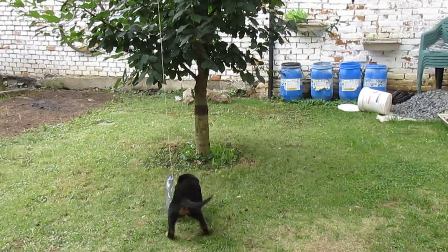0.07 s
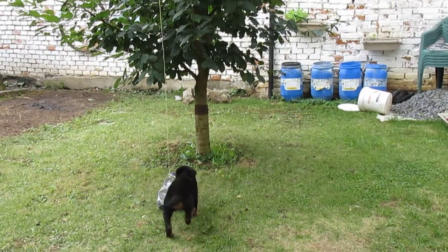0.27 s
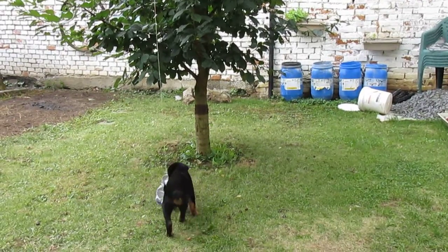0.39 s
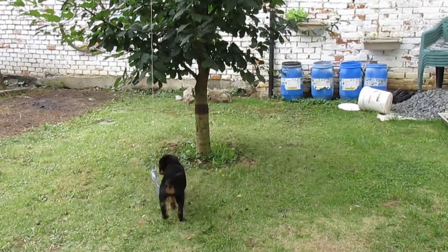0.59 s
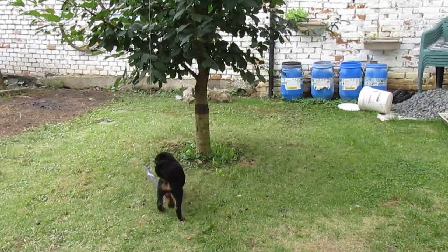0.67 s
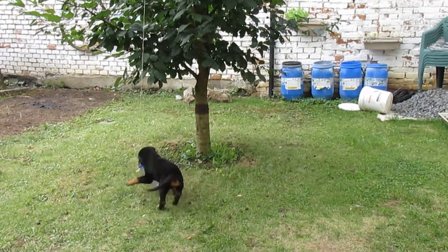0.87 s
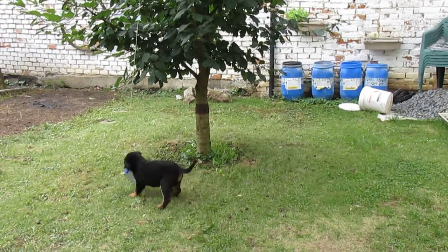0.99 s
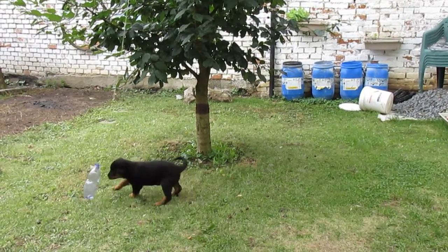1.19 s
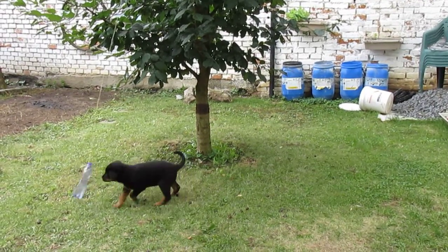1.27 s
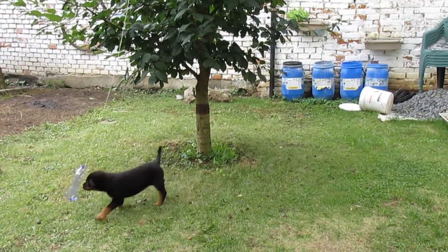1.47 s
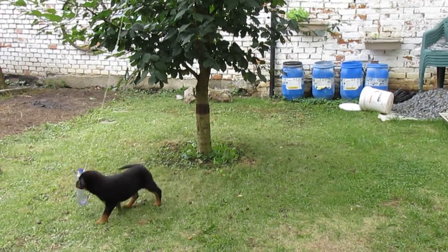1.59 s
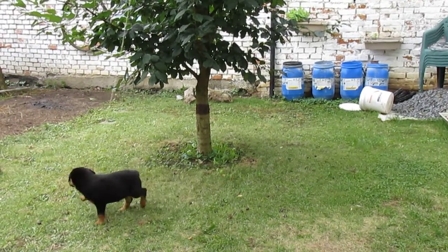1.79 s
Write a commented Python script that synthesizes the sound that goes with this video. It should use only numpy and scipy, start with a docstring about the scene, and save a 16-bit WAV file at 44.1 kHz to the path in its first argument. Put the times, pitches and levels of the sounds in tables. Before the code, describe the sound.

Low, uneven gusts buffet the microphone outdoors on a lawn. After a very brief, quiet puppy growl come two light taps and one sharp, hollow knock on an empty plastic bottle, then faint crinkles over soft leaf rustle.

```python
"""A lawn in a walled garden. A puppy growls briefly, slow pulses ringing in its throat, and knocks an
empty plastic bottle hanging from a rope: two light taps, one sharp hit and faint crinkles of the wall.
Gusts rumble on the microphone ports, largely in opposite phase left and right, with short buffets on top.
A fine rustle of leaves and grass comes from the left, over a bed of quiet air."""
import sys
import numpy as np
from scipy import signal
from scipy.fft import rfft, irfft
from scipy.io import wavfile
from scipy.ndimage import uniform_filter1d, minimum_filter1d

SR = 44100
rng = np.random.default_rng(int(sys.argv[2]) if len(sys.argv) > 2 else 0)


def master_out(mix):
    """Clip the mix to full scale and print it as 16-bit PCM to the path in sys.argv[1]."""
    frames = np.transpose(np.atleast_2d(mix))
    ceiling = np.clip(frames, -1, 1)
    pcm = np.round(ceiling * 32767).astype(np.int16)
    wavfile.write(sys.argv[1], SR, pcm)


N = 79380
T = np.arange(N) / SR
BIN_HZ = np.arange(N // 2 + 1) * SR / N

# Tone of the garden air. Each row: frequency in Hz, relative level in dB.
AIR_COLOUR = [(20, 12.5), (100, 17), (300, 8), (550, 1.5), (900, -1), (1500, -4), (2500, -9.5),
              (5000, -12.5), (10000, -14), (16000, -19)]

# Swells of the leaves and grass. Each row: time in seconds, relative level in dB.
RUSTLE_SWELLS = [(0.0, -61.5), (0.07, -53), (0.154, -59), (0.274, -52.5), (0.334, -63.5), (0.4, -69),
                 (0.416, -61), (0.596, -66), (0.616, -60.5), (0.636, -63.5), (0.71, -61), (0.732, -53),
                 (0.862, -64.5), (1.032, -56.5), (1.056, -63.5), (1.088, -57), (1.172, -58.5), (1.192, -50),
                 (1.238, -66), (1.332, -56), (1.382, -68), (1.618, -64), (1.638, -58.5), (1.8, -63.5)]
# Crisp ticks in the grass. Each row: start in seconds, relative level in dB.
GRASS_TICKS = [(.612, -53), (.728, -48), (.938, -50.5), (0.978, -54), (1.192, -60), (1.630, -48)]
# Tone of the rustle and of the ticks. Each row: frequency in Hz, relative level in dB.
RUSTLE_COLOUR = [(1500, -10.5), (3500, -8), (5500, -7.5), (7500, 0), (9000, 2.5), (11000, -0.5),
                 (13000, -10), (16000, -21)]
TICK_COLOUR = [(1500, -16), (5000, -18), (9000, 5.5), (12500, 1), (16000, -23)]
RUSTLE_GAIN_DB, RUSTLE_GRAIN_DB, RUSTLE_CORRELATION = 2.5, 1.5, 0.13

# Gusts on the microphone. Each row: time in seconds, relative level in dB, left minus right in dB.
GUSTS = [(0.0, -57, -13), (0.104, -61.5, -5), (0.18, -32, -4.5), (0.27, -25.5, 10), (0.3, -30.5, 3),
         (0.36, -25, 3.5), (0.476, -27.5, 10), (0.5, -38, 0.5), (0.56, -22, 3.5), (0.606, -27, 8),
         (0.65, -38.5, -2.5), (0.676, -27.5, -6), (0.716, -44, 30), (0.752, -22, 4), (0.846, -24.5, 11),
         (0.902, -29, 8.5), (0.976, -21.5, 8.5), (1.158, -33.5, 4.0), (1.332, -23.5, 2.5),
         (1.392, -41, 11.5), (1.514, -55, -4), (1.564, -45, -11), (1.604, -37, -14), (1.698, -68, 4),
         (1.744, -52.5, -9), (1.8, -60, 5)]
# Tone of the rumble in light and in strong wind. Each row: frequency in Hz, relative level in dB.
LIGHT_WIND_COLOUR = [(15, -4), (35, 2.5), (90, 2), (140, -16.5), (220, -24.5), (400, -37), (900, -96),
                     (3000, -100)]
STRONG_WIND_COLOUR = [(15, -18), (35, 4), (70, -2), (130, 4.5), (200, -9), (310, -23), (450, -31),
                      (800, -47.5), (3000, -82)]
LIGHT_GUST_DB, STRONG_GUST_DB, WIND_GAIN_DB, PORT_CORRELATION = -33.5, -23, 8.5, -0.79

# The puppy's throat resonances. Each row: frequency in Hz, bandwidth in Hz, relative level in dB.
THROAT_FORMANTS = [(396, 92, -4), (524, 86, -14)]
GROWL_DB, GROWL_PULSE_HZ, GROWL_JITTER, GROWL_SHIMMER_DB = -45.5, 109.8, 0.142, 3
GROWL_ONSET_DB, GROWL_ATTACK_S, GROWL_END_S = -0.5, 0.02, 0.058

WALLS_DB, WALLS_T60_S, WALLS_DELAY_S = -14, 0.3, 0.034

# Knocks on the bottle. Each row: start in seconds, gain in dB, low-pass cutoff of the contact in Hz.
KNOCKS = [(.1384, -11.5, 550), (0.2214, -10, 1500), (.7615, 1.5, 4340)]
# The bottle's hollow ring. Each row: frequency in Hz, relative level in dB, 60 dB decay in seconds.
BOTTLE_MODES = [(385, -4, .24), (428, -7, .27), (552, -3, .24), (651, -6, .2), (985, -10.5, .15),
                (1069, -12, .15), (1170, -13, .14), (1272, -12, .13), (1423, -10, .13), (1563, -10, .13),
                (1919, -12, .13), (2031, -13.5, .13), (2770, -14, .15), (3052, -19, .13)]
# Tone of the thin wall's crackle. Each row: frequency in Hz, relative level in dB.
CRACKLE_COLOUR = [(220, -15), (370, 12.5), (600, 13), (800, -17), (1100, 5), (1700, -1), (3300, -3.5),
                  (6000, -11.5), (9000, -57), (16000, -39)]
MODES_DB, CRACKLE_DB, CRACK_DB, BOTTLE_PAN_DB = -36, -37.5, -37, 0.5
REBOUND_S, REBOUND_GAIN_DB, REBOUND_CUTOFF_HZ = 0.007, 3, 840

# Eddies hitting the ports. Each row: centre time in seconds, level in dB, half length in seconds,
# upper edge in Hz, left minus right in dB.
EDDIES = [(0.26, -12.5, 0.0044, 155, 4), (0.323, -17, 0.0026, 150, 13), (0.352, -16, 0.0031, 313, 7.5),
          (0.362, -14.5, 0.0045, 241, 22), (0.406, -26, 0.0058, 350, 9), (0.461, -22.5, 0.0052, 303, 7),
          (0.555, -12, 0.006, 245, 14.5), (0.607, -22, 0.0052, 263, 11.5), (.636, -24, 0.0062, 203, -3.5),
          (.760, -11.5, 0.012, 120, 3.5), (0.83, -16, 0.0059, 259, 11), (0.849, -18.5, 0.0077, 235, 8),
          (0.946, -13.5, 0.0036, 260, 14.5), (0.956, -18.5, 0.0021, 276, 5), (.959, -33, 0.0021, 1020, 32),
          (0.975, -13, 0.0048, 270, -6), (1.013, -25, 0.0061, 333, 12.5), (1.046, -15.5, 0.017, 220, 5.5),
          (1.2, -23, 0.0066, 245, 16), (1.277, -13, 0.006, 235, -0.5), (1.319, -16.5, 0.0047, 305, -11.5),
          (1.335, -10, 0.0054, 144, 8), (1.571, -23, 0.0071, 95, -6), (1.606, -30.5, 0.005, 94, -8)]
BUFFET_LOW_CUT_RATIO, BUFFET_ROLLOFF_ORDER = 0.084, 5.65

# Crinkles of the plastic. Each row: start in seconds, level in dB.
CRINKLES = [(.266, -55), (1.0982, -56.5), (1.339, -57)]
# Tone of the crinkles. Each row: frequency in Hz, relative level in dB.
CRINKLE_COLOUR = [(700, -35), (1400, -16), (2100, 1), (3000, -14), (6000, -24)]

CEILING, LIMITER_S, HIGH_CUT_HZ = 0.9, 0.02, 15800


def from_db(db):
    return 10 ** (np.asarray(db) / 20)


def unit_rms(x):
    return x / np.sqrt(np.mean(x ** 2) + 1e-20)


def automation(rows):
    """Breakpoints in time become one curve per column."""
    times, *columns = np.transpose(rows)
    return [np.interp(T, times, column) for column in columns]


def decay(start_s, t60):
    """An envelope that opens at start_s and falls 60 dB in t60 seconds."""
    return (T >= start_s) * np.exp(-np.log(1000) * np.abs(T - start_s) / t60)


def pan(db):
    """Constant-power gains, with the left db above the right."""
    gains = from_db(np.array([[.5], [-.5]]) * db)
    return gains / np.sqrt(np.mean(gains ** 2, axis=0))


def stereo_noise(correlation):
    """White noise with a given left-right correlation."""
    mid, side = rng.standard_normal((2, N))
    return np.sqrt(1 + correlation) * mid + np.sqrt(1 - correlation) * side * np.array([[1], [-1]])


def coloured(noise, colour):
    """Noise through an EQ curve, brought to an rms of 1."""
    hz, db = np.transpose(colour)
    eq_db = np.interp(np.log(np.maximum(BIN_HZ, 1)), np.log(hz), db)
    return unit_rms(irfft(rfft(noise) * from_db(eq_db), N))


def levelled(noise, seconds):
    """Noise with its slow swings of level ironed out."""
    power = np.mean(noise ** 2, axis=0)
    for _ in range(2):
        power = uniform_filter1d(power, int(seconds * SR))
    return noise / np.sqrt(np.abs(power) + 1e-12)


def low_pass(x, hz):
    return signal.sosfilt(signal.butter(1, hz, fs=SR, output="sos"), x)


def ring(clicks, hz, t60):
    """Each click sets a decaying sine ringing."""
    radius, angle = np.exp(-np.log(1000) / (t60 * SR)), 2 * np.pi * hz / SR
    return signal.lfilter([0, np.sin(angle)], [1, -2 * radius * np.cos(angle), radius ** 2], clicks + 1e-18)


def garden_air():
    """A soft, wide, steady bed of dark noise."""
    return from_db(-52) * coloured(stereo_noise(0.22), AIR_COLOUR)


def rustle():
    """Countless tiny leaf and grass contacts merge into a grainy hiss; a few stand out as bright ticks."""
    swell_db, = automation(RUSTLE_SWELLS)
    grain = unit_rms(low_pass(rng.standard_normal(N), hz=150))
    hiss = from_db(swell_db + RUSTLE_GAIN_DB) * coloured(stereo_noise(RUSTLE_CORRELATION), RUSTLE_COLOUR)
    tick_envelope = sum(from_db(db) * decay(start_s, t60=0.034) for start_s, db in GRASS_TICKS)
    ticks = tick_envelope * coloured(stereo_noise(RUSTLE_CORRELATION), TICK_COLOUR)
    return (hiss + ticks) * from_db(RUSTLE_GRAIN_DB * grain) * pan(db=14)


def wind():
    """Turbulence at the ports: the rumble gets louder and opens up as the gust grows."""
    gust_db, pan_db = automation(GUSTS)
    white = stereo_noise(PORT_CORRELATION)
    light, strong = coloured(white, LIGHT_WIND_COLOUR), coloured(white, STRONG_WIND_COLOUR)
    strength = np.clip((gust_db - LIGHT_GUST_DB) / (STRONG_GUST_DB - LIGHT_GUST_DB), 0, 1)
    rumble = (1 - strength) * light + strength * strong
    return levelled(rumble, seconds=0.041) * from_db(gust_db + WIND_GAIN_DB) * pan(pan_db)


def growl():
    """A short run of slow, uneven pulses rings the puppy's throat."""
    times = np.cumsum(1 + GROWL_JITTER * rng.standard_normal(16)) / GROWL_PULSE_HZ
    times = np.abs(times - times[0])
    attack_db = GROWL_ONSET_DB * np.maximum(1 - times / GROWL_ATTACK_S, 0)
    shimmer_db = GROWL_SHIMMER_DB * rng.standard_normal(len(times))
    pulses = np.zeros(N)
    pulses[(times * SR).astype(int)] = from_db(attack_db + shimmer_db) * (times < GROWL_END_S)
    voice = sum(from_db(db) * ring(pulses, hz, t60=np.log(1000) / (np.pi * width_hz))
                for hz, width_hz, db in THROAT_FORMANTS)
    voice = signal.sosfilt(signal.butter(3, [280, 680], "band", fs=SR, output="sos"), voice)
    return from_db(GROWL_DB) * unit_rms(voice) * np.sqrt(GROWL_END_S * SR / N)  # rms over the growl's span


def wall_echoes(source):
    """The garden walls scatter back a weak, dull tail, different at each ear."""
    envelope = decay(WALLS_DELAY_S, WALLS_T60_S)
    tail = low_pass(stereo_noise(0.3), hz=854) * envelope / np.sqrt(np.sum(envelope ** 2))
    return from_db(WALLS_DB) * signal.fftconvolve(source, tail, axes=1)[:, :N]


def bottle_contact(start_s):
    """One contact rings the bottle's modes; the thin wall cracks and crackles out."""
    click = np.zeros(N)
    click[int(start_s * SR)] = 1
    modes = sum(from_db(MODES_DB + db) * rng.choice([-1, 1]) * ring(click, hz, t60)
                for hz, db, t60 in BOTTLE_MODES)
    crackle = from_db(CRACKLE_DB) * decay(start_s, t60=0.19) * coloured(stereo_noise(0.35), CRACKLE_COLOUR)
    crack = from_db(CRACK_DB) * decay(start_s, t60=0.065) * unit_rms(low_pass(stereo_noise(0.17), hz=3870))
    return modes + crackle + crack


def bottle_knocks():
    """Each knock is a tight flam: a strike, then its duller rebound."""
    knocks = 0
    for start_s, db, cutoff_hz in KNOCKS:
        strike = bottle_contact(start_s)
        rebound = from_db(REBOUND_GAIN_DB) * low_pass(bottle_contact(start_s + REBOUND_S), REBOUND_CUTOFF_HZ)
        knocks += from_db(db) * low_pass(strike + rebound, cutoff_hz)
    return knocks * pan(BOTTLE_PAN_DB)


def buffets():
    """Each eddy thumps the ports: a brief swell of pressure noise with a steep upper edge."""
    thumps = 0
    for centre_s, db, half_s, edge_hz, pan_db in EDDIES:
        low_cut = BIN_HZ ** 2 / (BIN_HZ ** 2 + (BUFFET_LOW_CUT_RATIO * edge_hz) ** 2)
        high_cut = 1 / np.sqrt(1 + (BIN_HZ / edge_hz) ** (2 * BUFFET_ROLLOFF_ORDER))
        pressure = irfft(rfft(stereo_noise(PORT_CORRELATION)) * low_cut * high_cut, N)
        swell = np.exp(-.5 * ((T - centre_s) / half_s) ** 2)
        thump = unit_rms(pressure * swell) * np.sqrt(np.mean(swell ** 2))  # rms near 1 at the crest
        thumps += thump * from_db(db) * pan(pan_db)
    return thumps


def crinkles():
    """The plastic crinkles faintly as the puppy mouths it."""
    envelope = sum(from_db(db) * decay(start_s, t60=0.088) for start_s, db in CRINKLES)
    return envelope * coloured(stereo_noise(0.41), CRINKLE_COLOUR) * pan(BOTTLE_PAN_DB)


def scene():
    """The breezy garden mix; only the puppy and its bottle feed the wall echoes."""
    air = garden_air()
    play = bottle_knocks() + crinkles() + growl()
    return air + rustle() + wind() + buffets() + play + wall_echoes(play)


def record(dry):
    """A smooth limiter ducks any peak over the ceiling; a steep filter trims the top."""
    span = int(LIMITER_S * SR)
    gain = CEILING / np.maximum(np.abs(dry).max(axis=0), CEILING)
    gain = uniform_filter1d(minimum_filter1d(gain, span), span)
    high_cut = signal.ellip(10, .1, 80, HIGH_CUT_HZ, fs=SR, output="sos")
    return signal.sosfilt(high_cut, dry * gain)


dry = scene()
out = record(dry)
master_out(out)
```